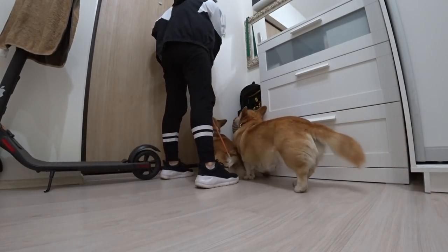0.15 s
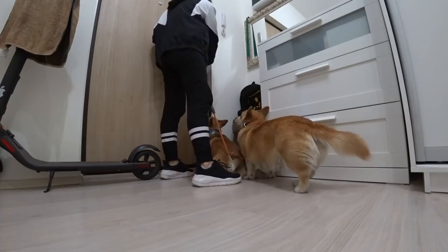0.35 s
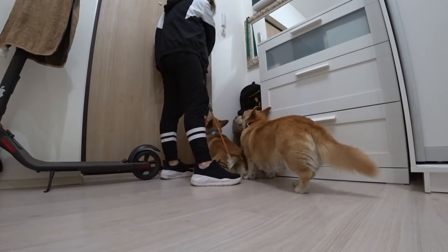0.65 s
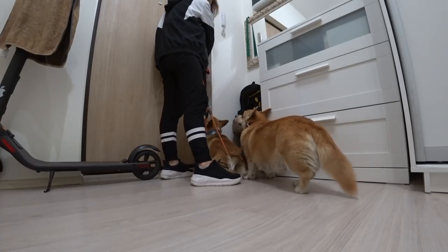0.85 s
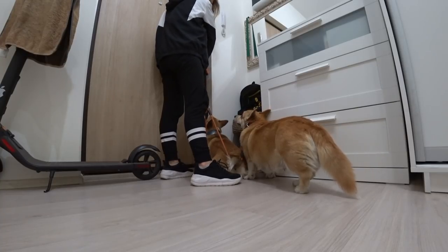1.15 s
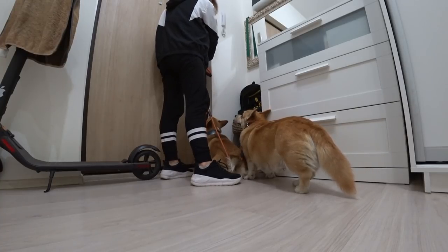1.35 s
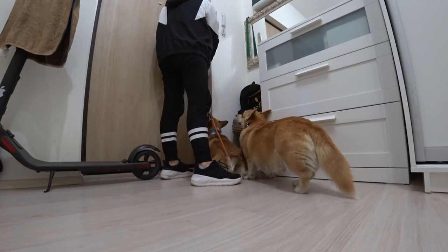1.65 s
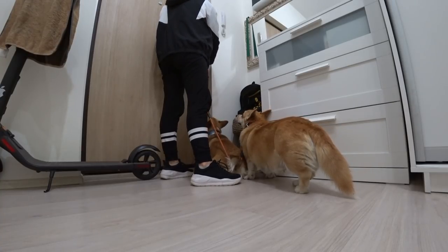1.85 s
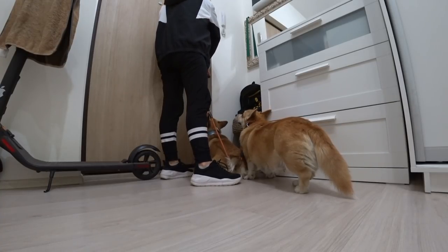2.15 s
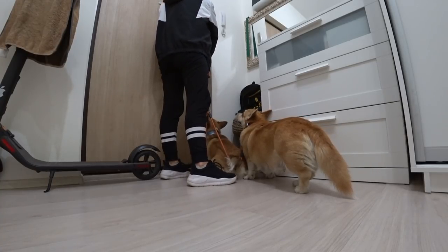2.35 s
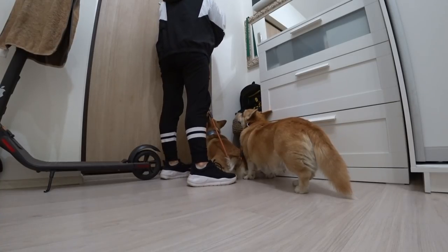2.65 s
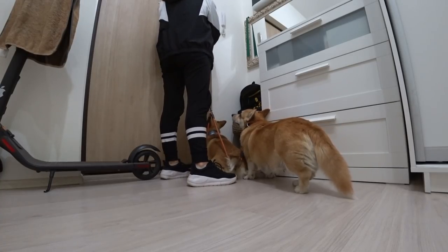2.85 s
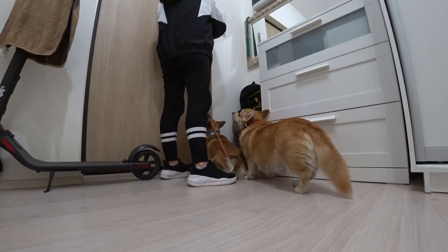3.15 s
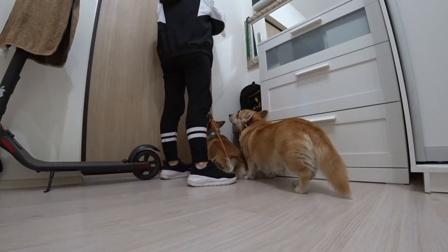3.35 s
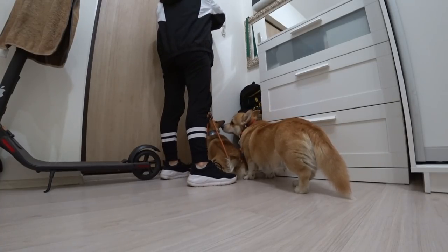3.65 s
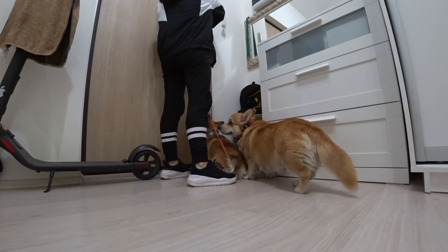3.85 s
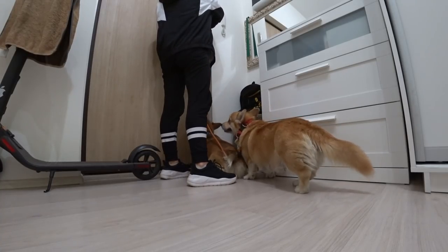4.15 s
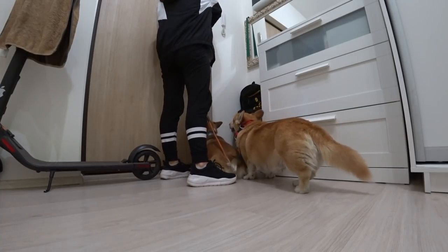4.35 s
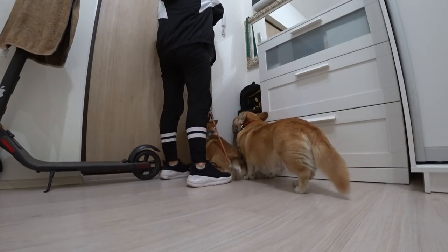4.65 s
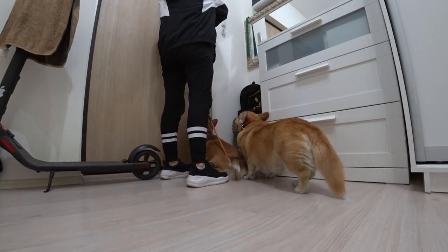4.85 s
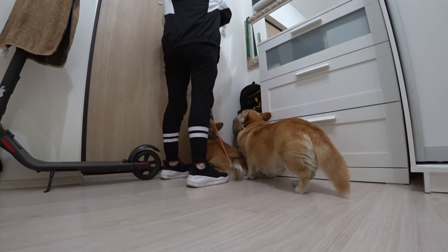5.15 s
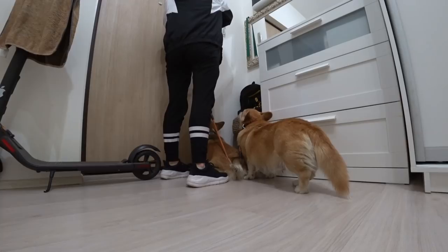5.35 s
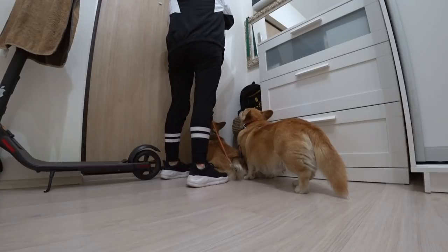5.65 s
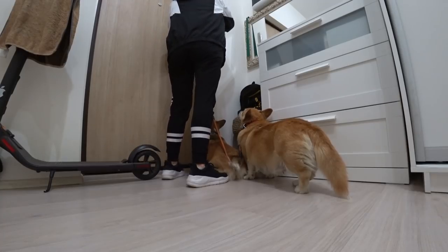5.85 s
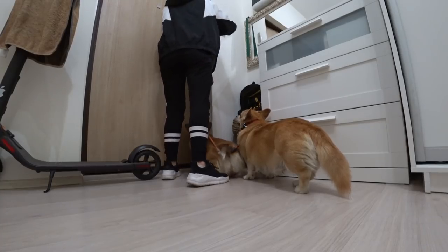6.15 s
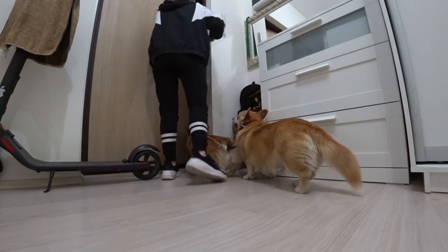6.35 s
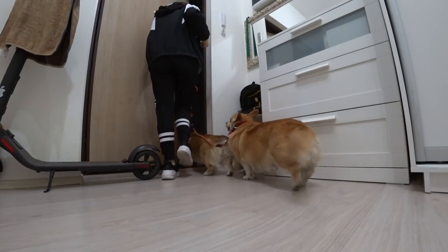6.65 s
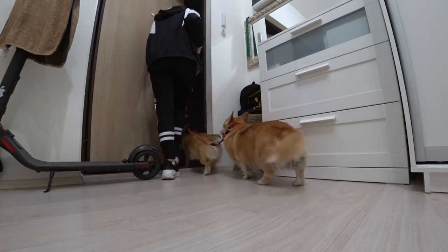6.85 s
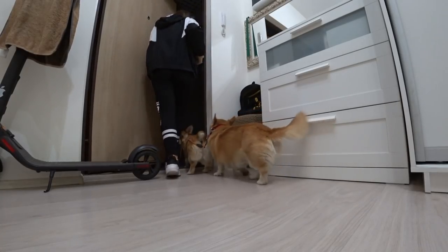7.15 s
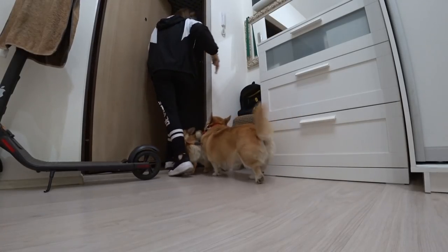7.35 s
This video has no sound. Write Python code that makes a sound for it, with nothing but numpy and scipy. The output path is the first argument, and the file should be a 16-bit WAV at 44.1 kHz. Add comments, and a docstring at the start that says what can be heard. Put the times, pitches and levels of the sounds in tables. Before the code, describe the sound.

In a small, hard-walled hallway, a person handles dog leashes at the front door. Two quick scuffs open, then cloth rustles while buckles and handles knock irregularly, one knock standing out early. Small rings jingle midway with a short upward squeak. Near the end, shoes and paws shuffle with dry, bright creaks and gritty scrapes. The stereo microphone stays in the hallway, with steady faint background noise and short bright echoes.

```python
"""Dog leashes are handled at a front door in a small, hard-walled hallway that rings after each sound.
Over a steady noise and a low hum that dies away, straps and a jacket rustle: clumps of uneven tiny clicks.
Throughout, buckles and handles knock (a quick clatter, shaped by the struck parts) and clips ping (fading
tones); in the middle small rings jingle (many random pings) and one squeak (a rough tone) slides up. Two scuffs
open and most come near the end, as person and dogs shuffle: uneven slips ring a creak over a gritty scrape."""
import sys
import numpy as np
from scipy import signal
from scipy.fft import rfft
from scipy.io import wavfile
from scipy.ndimage import uniform_filter1d

SR = 44100
rng = np.random.default_rng(int(sys.argv[2]) if len(sys.argv) > 2 else 0)


def log_audio(samples):
    """Write samples as a 16-bit WAV file to the path given in sys.argv[1]."""
    # one column per channel
    frames = np.atleast_2d(samples).T
    # limit to full scale, then quantise
    limited = np.clip(frames, -1, 1)
    pcm = np.round(limited * 32767).astype(np.int16)
    wavfile.write(sys.argv[1], SR, pcm)


N = 331191  # length of the scene in samples

# tone colour of each noise: f/Hz, relative level per hertz/dB
AIR_COLOUR = [(25, -33), (60, -49), (140, -4), (400, 4), (1100, 7.5), (3000, 0.5), (8000, -3.5),
              (12000, -7), (16000, -16)]
RUSTLE_COLOUR = [(40, -75), (150, -10.5), (400, -2), (1200, 1), (2600, 1), (4200, 2.5), (7500, -0.5),
                 (11000, -8), (15500, -18.5)]
SCRAPE_COLOUR = [(30, -31.5), (350, -22.5), (650, -4), (1500, -5.5), (2600, -6), (4300, 1.5), (7000, -0.5),
                 (10000, -8.5), (15500, -28)]
KNOCK_COLOUR = [(30, -44), (80, -52), (150, -18), (300, -5), (500, -3.5), (1300, -1.5), (2700, -3.5),
                (4500, -3.5), (7000, -3.5), (10000, -8.5), (15500, -21.5)]
# how long the hallway rings: f/Hz, time to fall by 60 dB/s
HALL_RING_TIMES = [(150, 0.71), (400, 0.62), (1100, 0.85), (2700, 0.8), (5000, 0.65), (7500, 0.57),
                   (11000, 0.37), (16000, 0.16)]
# how alike the left and right sounds are: f/Hz, likeness/0-1
EAR_LIKENESS = [(150, .99), (300, 0.93), (600, 0.69), (1200, 0.47), (7000, 0.63), (12000, 0.42)]
# movements that rub straps and jacket: t/s, length/s, level/dB
RUBS = [ (-.04, 0.039, -27), (.27, 0.26, -40.5), (1.18, 0.32, -47), (2.2, 0.33, -36.5), (3.44, 0.18, -32),
        (3.9, 0.11, -30.5), (4.18, 0.62, -37), (4.77, 0.12, -27), (5.05, 0.88, -50.5), (5.68, 0.21, -28.5),
        (5.9, 0.29, -36.5), (6.76, 0.33, -30), (7.16, 0.17, -32), (7.43, 0.087, -39.5)]
# stick-slip scuffs: t/s, length/s, place of greatest pressure/0-1, creak level/dB, scrape level/dB
SCUFFS = [ (0.158, 0.038, 0.47, -16, -25), (0.196, 0.023, .3, -15.5, -16.5), (3.868, 0.0047, 0.6, -24, -27),
          (3.993, 0.0049, .5, -27.5, -20), (4.044, 0.0051, 0.7, -25, -40), (4.171, 0.032, 0.7, -28.5, -36),
          (5.769, .1, 0.4, -32, -15.5), (5.939, 0.0072, 0.6, -21.5, -20), (6.115, 0.0068, 0.7, -26, -29),
          (6.288, 0.0023, .5, -51, -29.5), (6.501, .018, 0.66, -16, -20.5),
          (6.558, 0.0041, 0.9, -16.5, -18.5), (6.570, 0.022, 0.9, -23.5, -24.5),
          (6.67, 0.058, 0.35, -20, -23.5), (6.704, 0.048, .65, -16, -16), (6.908, 0.0117, .3, -21.5, -42),
          (6.924, 0.0062, .5, -16.5, -35), (6.997, 0.036, 0.76, -15, -23.5), (7.039, 0.041, 0.3, -13, -15),
          (7.188, 0.018, .55, -19, -22), (7.262, 0.034, 0.17, -13.5, -20), (7.442, 0.067, 0.9, -22, -33)]
# modes that each slip rings, two broad and four narrow: f/Hz, width/Hz, relative level/dB
CREAK_MODES = [(3350, 460, -1), (3866, 350, 1.5), (3350, 30, 0), (3720, 45, -3), (4035, 52, -5),
               (4070, 30, -5)]
# buckles and handles knocking: t/s, level/dB, bass before weighting/dB, treble before weighting/dB,
# clatter decay/s, ring of the struck part f/Hz
KNOCKS = [ (.335, -31.5, -7, -9, 0.012, 795), (.549, -26, -10, -8, 0.0036, 710),
          (.594, -18, -4, -5.5, 0.0038, 1240), (.640, -24, 2, -10, 0.0074, 2020),
          (1.029, -17, -3.5, -6.5, 0.004, 990), (1.316, -31.5, -4.5, -9, 0.0069, 680),
          (1.468, -32, -2.5, -17, 0.014, 1480), (1.524, -40.5, 6, 2, 0.0039, 1790),
          (1.689, -35.5, -18, -10.5, 0.0015, 2710), (1.847, -31.5, -2.5, -3.5, 0.0052, 750),
          (1.977, -33, -1, -16, 0.0017, 1760), (2.021, -24, -7, -4.5, .0065, 1740),
          (2.052, -27, -0.5, -16, 0.0096, 1740), (2.290, -10, 2.5, -5, 0.018, 1000),
          (2.326, -16.5, 3.5, -12, 0.012, 423), (2.846, -27, -0.5, -10, 0.0047, 2900),
          (2.954, -21.5, -2.5, 3.5, 0.0057, 2080), (3.015, -30, 5, -2, 0.0059, 2200),
          (3.435, -34, -20.5, 23, 0.01, 3440), (3.525, -24, -12, 7, 0.038, 3180),
          (3.652, -21.5, -2.5, -2.5, 0.012, 2220), (3.695, -21.5, 10, 0.5, 0.013, 1800),
          (3.994, -37, 2, 15.5, .0064, 3235), (4.111, -34, -6.5, 13, 0.0036, 2200),
          (4.253, -23.5, -2.5, 0.5, .015, 1180), (4.301, -14.5, 3, -2, 0.0098, 1143),
          (4.356, -16.5, -12, 5, 0.0043, 2030), (4.503, -35.5, -18, 20, 0.0057, 1900),
          (4.610, -33.5, -11, 12, 0.0092, 1740), (4.765, -26.5, -22, 13, .02, 3190),
          (4.870, -14, -2.5, 3.5, 0.0038, 1620), (5.463, -24.5, 2.5, 0, 0.023, 560),
          (5.498, -21.5, 7.5, 2, 0.014, 3940), (5.654, -17.5, 7, 0, .011, 1480),
          (6.325, -37, -9, -9, 0.0041, 1370), (6.215, -49, -2, 16, 0.0044, 2200),
          (6.393, -36, -15, 16, 0.0027, 5630)]
# resonances of the knocked door and handles: f/Hz, width/Hz, lift/dB
BODY_RESONANCES = [(420, 110, 4), (544, 18, 2), (877, 105, 0.5), (1092, 18, 4), (1240, 13, 1),
                   (1840, 680, 1)]
# parts that ring on, metal clips high, handles and door low: t/s, level/dB, f/Hz, time to fall by 60 dB/s
CLINKS = [ (1.319, -42.5, 8560, 0.092), (1.525, -42.5, 7390, 0.064), (1.847, -43, 11150, .045),
          (2.295, -24, 7000, 0.0078), (2.846, -47, 12700, .06), (2.849, -37.5, 3220, 0.051),
          (3.016, -38, 12600, 0.092), (3.436, -36, 10700, .022), (3.556, -22, 7960, .022),
          (3.706, -33, 182, 0.29), (3.712, -26.5, 572, .055), (3.997, -42, 13200, .15),
          (4.305, -35, 178.3, 0.22), (4.365, -23, 7510, 0.042), (4.585, -37, 6300, .11),
          (4.617, -31.5, 6295, 0.21), (4.872, -21.5, 610, 0.048), (4.874, -22, 4250, .018),
          (5.471, -39, 11800, 0.09), (5.470, -27, 596, 0.069), (5.667, -47, 86, 0.17),
          (5.688, -39.5, 138, .15), (5.785, -17, 4050, 0.13)]
# tugs that shake the small rings: t/s, length/s, level/dB
TUGS = [(3.532, 0.077, -31), (3.81, 0.033, -37), (3.912, 0.083, -38), (4.33, .05, -20.5), (4.49, .02, -33),
        (4.58, 0.045, -35.5), (4.741, 0.056, -37)]
# small rings on the leash: f/Hz, relative level/dB
SMALL_RINGS = [(6290, 5), (7560, 2), (8060, 2), (10560, 7.5), (11900, 5), (13030, 3), (14800, -4)]

TAPS = 2048  # filter length in samples
BINS = np.fft.rfftfreq(TAPS, 1 / SR)  # frequencies in Hz at which filters are drawn
MOMENT = SR / 20  # samples: a blow's level is its energy spread over a twentieth of a second
AIR_DB = -46
RUB_ATTACK_S, RUB_RELEASE_S = 0.042, 0.031
FIDGET_DB = -66.5  # between movements the cloth is never quite still
LIGHT_TOUCH_DB = -4.5  # pressure at both ends of a scuff, against its peak
RING_LIFT_DB, RING_SHARPNESS = 5, 3.4  # height and narrowness of the struck part's ring
# a struck part drops back once, weaker, duller and looser; all are changes from the first blow
REBOUND_S, REBOUND_DB, REBOUND_LOOSENESS = .034, -13.5, 1.6
REBOUND_BASS_DB, REBOUND_TREBLE_DB = 3.5, -7.5
TUG_ATTACK_S, TUG_RELEASE_S = 0.02, 0.047
PING_T60_S = .034  # time in which a small ring's ping falls by 60 dB
RING_SPREAD = 0.052  # whole range of pitch, as a share of the ring's own
TOUCH_RANGE_DB = 20  # softest against hardest touch
SQUEAK_S, SQUEAK_FROM_HZ, SQUEAK_TO_HZ, SQUEAK_GLIDE_S = 3.905, 1020, 1780, 0.018
CATCH_DB, CATCH_S = -21.5, .003  # loud catch: level and time to its peak
SLIDE_DB, SLIDE_S = -36, 0.023  # faint slide: level and time to its peak
EDGE_HZ = 15900  # upper edge of the sound


def amp(db):
    """Turns decibels into a gain."""
    return 10 ** (np.asarray(db) / 20)


def unit(x):
    """Scales to an energy of one."""
    return x / np.sqrt(np.sum(x ** 2) + 1e-20)


def evened(x):
    """Scales to an rms (average strength) of one."""
    return unit(x) * np.sqrt(x.size)


def read(points, hz):
    """Reads between a table's points on a log-frequency axis."""
    f, value = np.transpose(points)
    return np.interp(np.log(hz + 1), np.log(f), value)


def add(mix, s, sound):
    """Mixes a sound in at time s."""
    part = mix[..., max(round(s * SR), 0):][..., :sound.shape[-1]]
    part += sound[..., :part.shape[-1]]


def causal(db):
    """Makes a filter with this gain on BINS that responds as early as it can (minimum phase)."""
    log_gain = np.log(amp(np.r_[db, db[-2:0:-1]]))
    return np.fft.ifft(np.exp(np.conj(signal.hilbert(log_gain)))).real


def whiten(x):
    """Keeps the rhythm of a run of clicks but levels its spectrum."""
    power = uniform_filter1d(abs(rfft(x, 4 * TAPS)) ** 2, size=3)[::4]
    db = 10 * np.log10(power / power.mean() + 1e-3)
    return unit(signal.fftconvolve(x, causal(-db)))


def grains(count, spread_db):
    """A dense run of tiny clicks of very uneven size."""
    return rng.standard_normal(count) * amp(spread_db * np.minimum(rng.exponential(1, count), 5))


def effort(moves, attack, release):
    """Strength of a run of movements: each builds up, holds for its length and dies away."""
    t = np.arange(N) / SR
    power = 0
    for s, length, db in moves:
        rise = np.clip((t - s) / attack, 0, 1)
        fall = np.exp(-np.maximum(t - s - length, 0) / release)
        power = power + (amp(db) * rise * fall) ** 2
    return np.sqrt(power)


def diffuse(count):
    """Short-time spectra of noise from all sides, with the left-right likeness set by pitch."""
    hz, t, (a, b) = signal.stft(rng.standard_normal((2, count)), SR, nperseg=512)
    same = np.clip(read(EAR_LIKENESS, hz), 0, 1)[:, None]
    mid, side = a * np.sqrt(1 + same), b * np.sqrt(1 - same)
    return hz[:, None], t, np.array([mid + side, mid - side])


def hallway(x, direct_db, early_db, pan_db):
    """Direct sound, a cluster of near-wall echoes and a tail that dies faster in the high treble."""
    hz, t, spectra = diffuse(count=32768)
    tail = spectra * amp(-60 * t / read(HALL_RING_TIMES, hz))
    response = unit(signal.istft(tail, SR)[1])
    t = np.arange(response.shape[1]) / SR
    hits = rng.random(len(t)) < 2500 / SR  # about 2500 echoes a second
    echoes = rng.standard_normal(len(t)) * hits * np.exp(-t / 0.03)
    response += amp(early_db) * unit(np.array([echoes, echoes]))
    response[:, 0] += amp(direct_db) / np.sqrt(2)
    response = np.sqrt(2) * unit(response) * amp([[pan_db / 2], [-pan_db / 2]])
    return signal.fftconvolve(x[None], response, axes=1)


def air():
    """The quiet background of the flat: steady noise coloured by pitch."""
    hz, t, spectra = diffuse(N)
    noise = signal.istft(spectra * amp(read(AIR_COLOUR, hz)), SR)[1][:, :N]
    return amp(AIR_DB) * evened(noise)


def boom():
    """A low resonance of the hallway dies away from the start, by 60 dB in 2.4 s."""
    t = np.arange(N) / SR
    return amp(-57.5 - 60 * t / 2.4) * np.sin(2 * np.pi * 138 * t)


def rustle():
    """Fibres catch and let go in clumps as straps and sleeves move."""
    strength = effort(RUBS, RUB_ATTACK_S, RUB_RELEASE_S) + amp(FIDGET_DB)
    clumps = evened(uniform_filter1d(rng.standard_normal(N), size=400))
    fibres = grains(N, spread_db=7.0) * amp(5.9 * clumps)
    rubbing = evened(signal.oaconvolve(fibres, causal(read(RUSTLE_COLOUR, BINS)))[:N])
    return hallway(rubbing * strength, direct_db=-1.0, early_db=-7.5, pan_db=-.5)[:, :N]


def creak_ring():
    """Ring of one stroke: the contact shifts each mode by a share of its width."""
    shifts = 0.49 * rng.standard_normal(len(CREAK_MODES))
    modes = 0
    for (hz, width, db), shift in zip(CREAK_MODES, shifts):
        modes = modes + amp(db) ** 2 / (1 + (2 * ((BINS - hz) / width - shift)) ** 2)
    tilt = read([(100, -39), (1500, -1.0), (3200, -0.5), (5000, 7.0), (12000, -21.0)], BINS)  # (Hz, dB)
    return causal(10 * np.log10(modes) + tilt)


def scuffs():
    """Uneven slips ring a bright, dry creak over a broad gritty scrape."""
    grit, creak, scrape = causal(read(SCRAPE_COLOUR, BINS)), np.zeros(N), np.zeros(N)
    for s, length, peak, creak_db, scrape_db in SCUFFS:
        count = max(round(length * SR), 32)
        place = np.linspace(0, 1, count)
        pressure_db = np.interp(place, [0, np.clip(peak, 0, 1), 1], [LIGHT_TOUCH_DB, 0, LIGHT_TOUCH_DB])
        stroke = signal.windows.tukey(count, .2) * amp(pressure_db)  # pressure builds, then lets go
        gaps = rng.uniform(.3, 1.7, count) * SR / 800  # about 800 slips a second
        at = np.cumsum(np.r_[min(count // 8, 40), gaps]).astype(int)
        at = at[at < count]
        slips = np.zeros(count)
        slips[at] = amp(2.6 * rng.standard_normal(len(at)))
        ringing = unit(signal.fftconvolve(slips * stroke, creak_ring()))
        add(creak, s, amp(creak_db) * ringing * np.sqrt(count))
        scraping = unit(signal.fftconvolve(grains(count, spread_db=3.5) * stroke, grit))
        add(scrape, s, amp(scrape_db) * scraping * np.sqrt(count))
    creak = hallway(creak, direct_db=7.5, early_db=0.0, pan_db=-2.6)
    scrape = hallway(scrape, direct_db=0, early_db=1.0, pan_db=-1)
    return (creak + scrape)[:, :N]


def knock(level_db, bass_db, treble_db, clatter, ring_hz):
    """A quick clatter of contacts: heavy parts add bass, bare metal adds treble, each part has a broad ring."""
    t = np.arange(SR // 8) / SR
    decay = np.exp(-t / max(clatter, 1 / SR))
    contacts = grains(len(t), spread_db=2.5) * decay * (1 - np.exp(-t / 0.005))
    # the parts meet over a few milliseconds
    clicks = whiten(contacts)[:len(t)] * (1 - np.exp(-t / 0.0029))
    colour = read(KNOCK_COLOUR, BINS)
    for hz, width, db in BODY_RESONANCES:
        colour += db / (1 + (2 * (BINS - hz) / width) ** 2)
    colour += RING_LIFT_DB / (1 + (RING_SHARPNESS * (BINS / ring_hz - 1)) ** 2)
    # weights: (Hz, share of the bass or treble setting)
    bass = bass_db * read([(70, 0.29), (140, 1.4), (280, 1.06), (650, 0.19)], BINS)
    treble = treble_db * read([(2000, 0), (11000, 0.92)], BINS)
    body = causal(colour + bass + treble) / np.sqrt(np.mean(amp(colour) ** 2))
    return amp(level_db) * signal.fftconvolve(unit(clicks), body) * np.sqrt(MOMENT)


def knocks():
    """Every knock and its rebound share one freshly drawn pattern of hallway echoes."""
    out = np.zeros((2, N))
    for s, level_db, bass_db, treble_db, clatter, ring_hz in KNOCKS:
        blow = np.zeros(SR // 4)
        add(blow, 0, knock(level_db, bass_db, treble_db, clatter, ring_hz))
        rebound = knock(level_db + REBOUND_DB, bass_db + REBOUND_BASS_DB, treble_db + REBOUND_TREBLE_DB,
                        clatter * REBOUND_LOOSENESS, ring_hz)
        add(blow, REBOUND_S, rebound)
        add(out, s, hallway(blow, direct_db=-5.5, early_db=-2, pan_db=-0.5))
    return out


def clinks():
    """Each part rings with a close pair of modes and a weaker one above."""
    t, out = np.arange(SR // 4) / SR, np.zeros(N)
    partials = [(1, 4), (1.014, -1), (1.48, -19)]  # (times the pitch, dB)
    for s, level_db, hz, t60 in CLINKS:
        ping = sum(amp(db) * np.cos(2 * np.pi * hz * ratio * t) for ratio, db in partials)
        fading = unit(ping * amp(-60 * t / t60))
        add(out, s, amp(level_db) * fading * np.sqrt(MOMENT))
    return hallway(out, direct_db=-2, early_db=5, pan_db=-1.2)[:, :N]


def jingle():
    """Many small rings of slightly different size touch at random, each with its own short ping."""
    first = TUGS[0][0]
    last = TUGS[-1][0] + TUGS[-1][1] + 4 * TUG_RELEASE_S
    t, out = np.arange(SR // 12) / SR, np.zeros(N)
    for when, which, size, softness in rng.random(size=(2400, 4)):
        hz, db = SMALL_RINGS[int(which * len(SMALL_RINGS))]
        pitch = hz * (1 + RING_SPREAD * (size - .5))
        level = amp(db - TOUCH_RANGE_DB * softness - 60 * t / PING_T60_S)
        add(out, first + when * (last - first), level * np.sin(2 * np.pi * pitch * t))
    steady = unit(out) * np.sqrt((last - first) * SR)
    shaken = steady * effort(TUGS, TUG_ATTACK_S, TUG_RELEASE_S)
    return hallway(shaken, direct_db=6, early_db=-10, pan_db=1.0)[:, :N]


def squeak():
    """A short rough tone that slides upward and breaks up as the grip comes and goes."""
    t = np.arange(SR // 8) / SR
    pitch = SQUEAK_TO_HZ + (SQUEAK_FROM_HZ - SQUEAK_TO_HZ) * np.exp(-t / SQUEAK_GLIDE_S)
    level = 0
    for db, peak in [(CATCH_DB, CATCH_S), (SLIDE_DB, SLIDE_S)]:
        level = level + amp(db) * (t / peak * np.exp(1 - t / peak)) ** 2
    waver = 1 + 0.064 * evened(uniform_filter1d(rng.standard_normal(len(t)), size=60))
    grip_db = 4 * evened(uniform_filter1d(rng.standard_normal(len(t)), size=200))
    grip = evened(amp(grip_db))
    tone = np.sqrt(2) * np.sin(2 * np.pi * np.cumsum(pitch * waver) / SR)
    return SQUEAK_S, hallway(tone * grip * level, direct_db=9, early_db=-4, pan_db=-2)


def scene():
    """All handling sounds over the background and the low resonance."""
    mix = air() + boom() + rustle() + scuffs() + knocks() + clinks() + jingle()
    add(mix, *squeak())
    return mix


def record(dry):
    """Rounds off the highest peaks, then removes what lies above the upper edge."""
    rounded = dry / (1 + dry ** 6) ** (1 / 6)
    lowpass = signal.firwin(511, EDGE_HZ, window=("kaiser", 9), fs=SR)
    return signal.oaconvolve(rounded, lowpass[None], "same")


dry = scene()
out = record(dry)
log_audio(out)
```